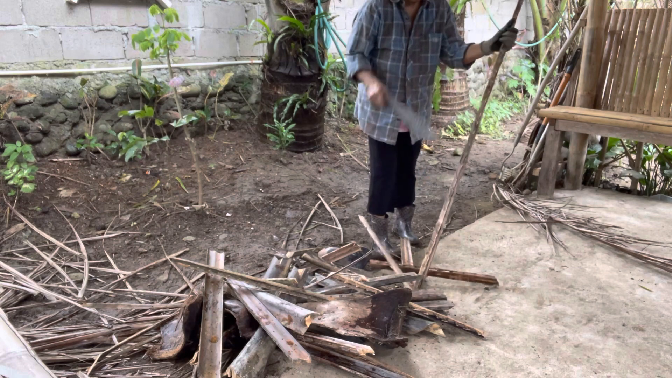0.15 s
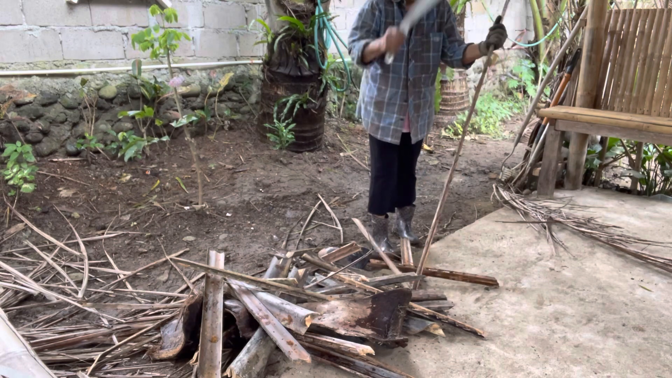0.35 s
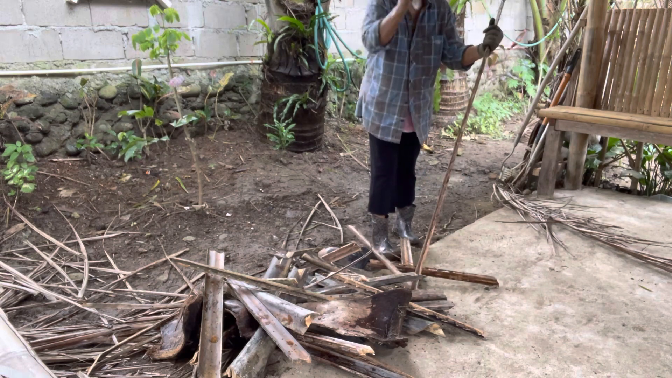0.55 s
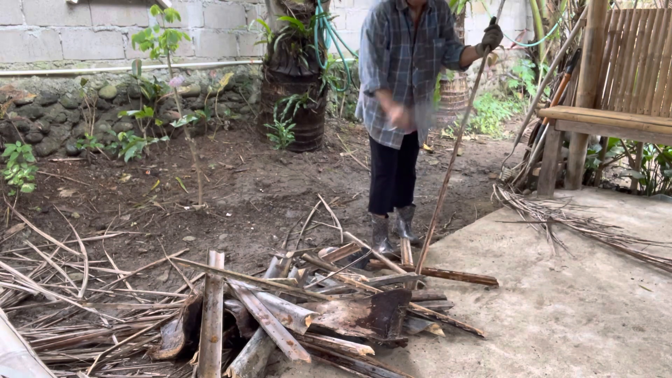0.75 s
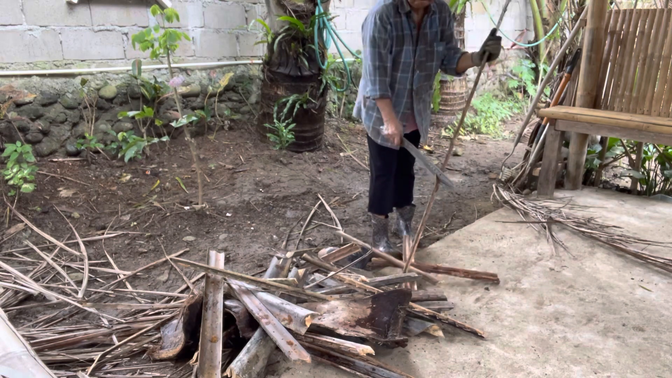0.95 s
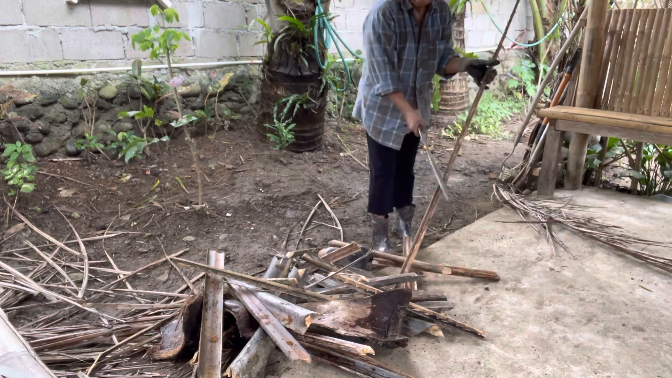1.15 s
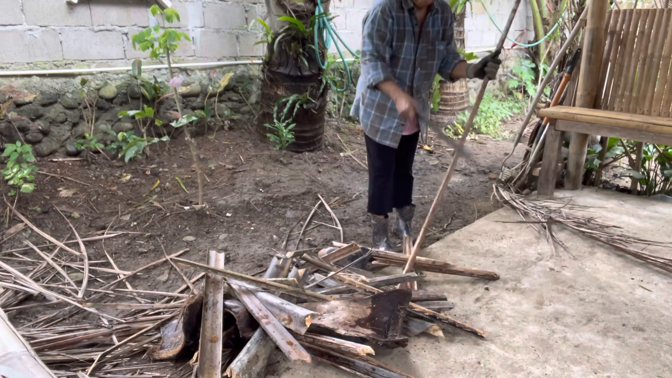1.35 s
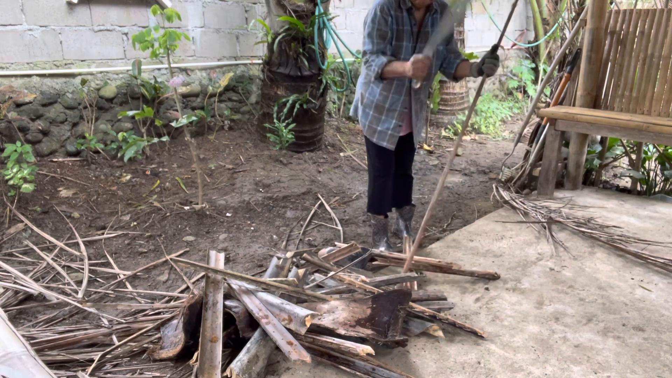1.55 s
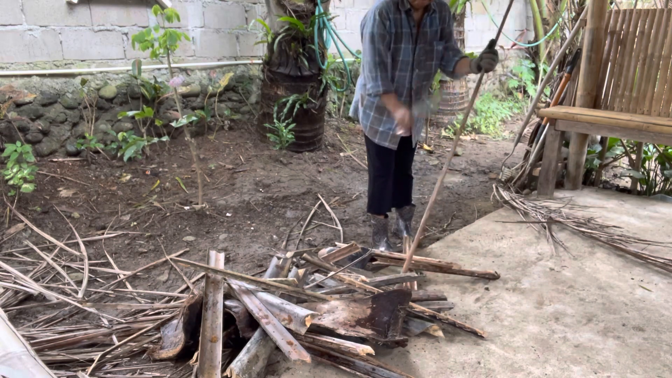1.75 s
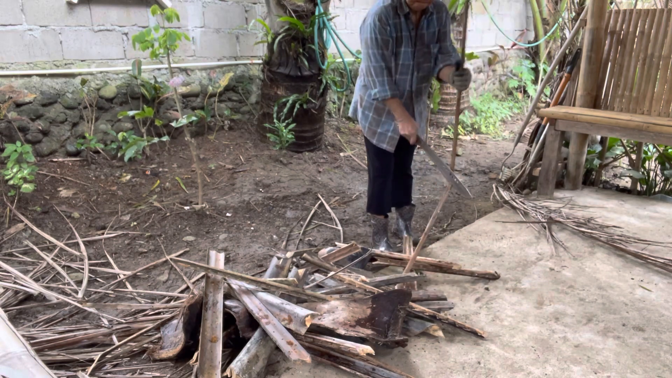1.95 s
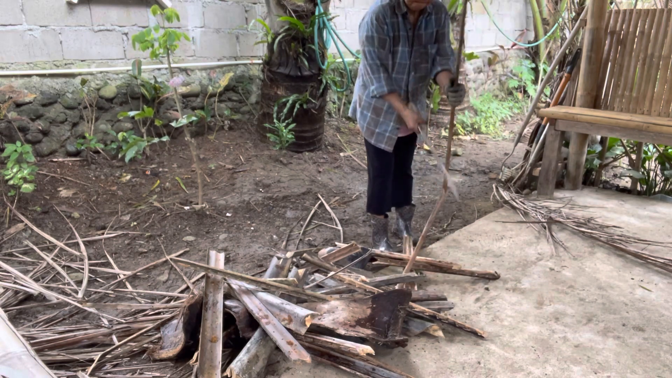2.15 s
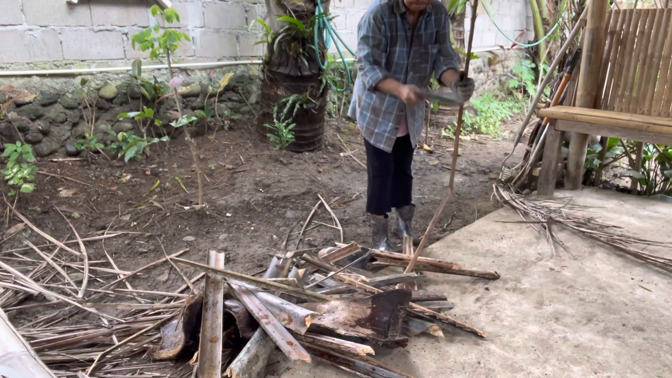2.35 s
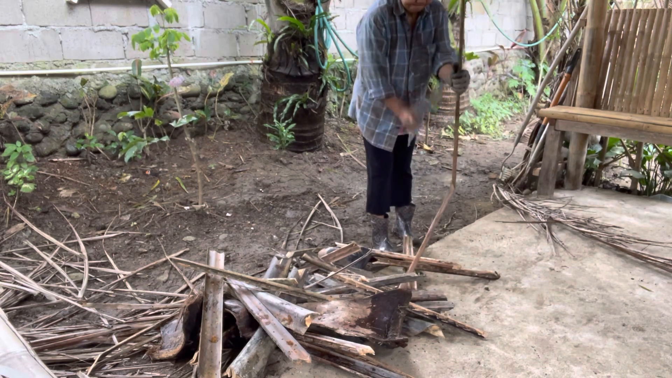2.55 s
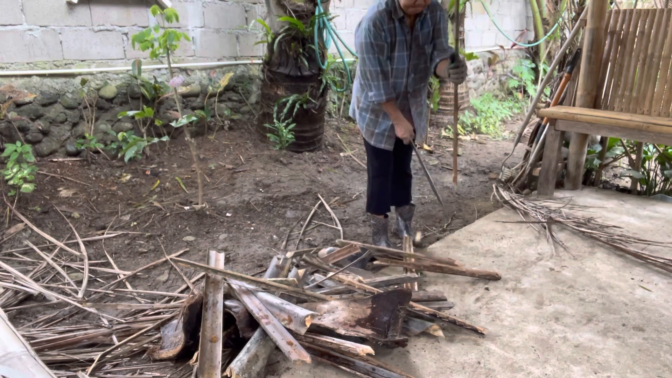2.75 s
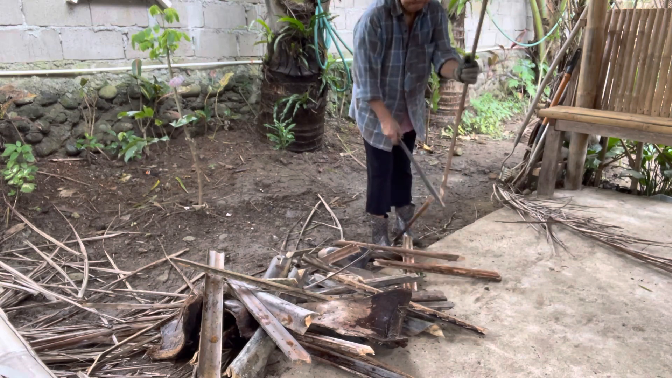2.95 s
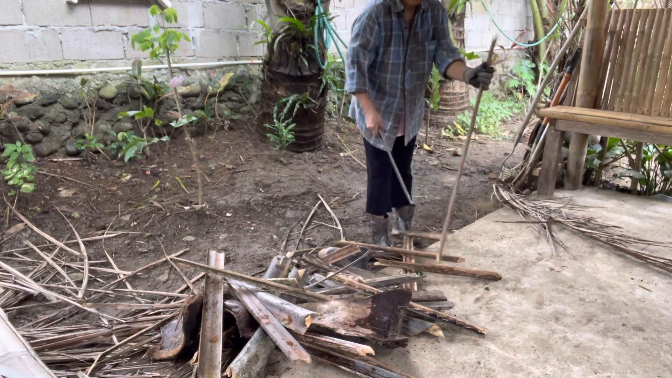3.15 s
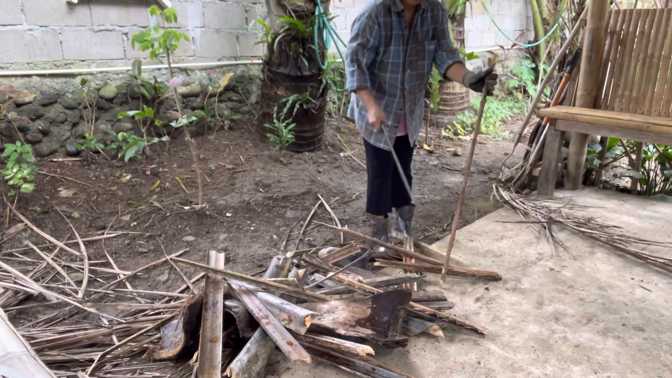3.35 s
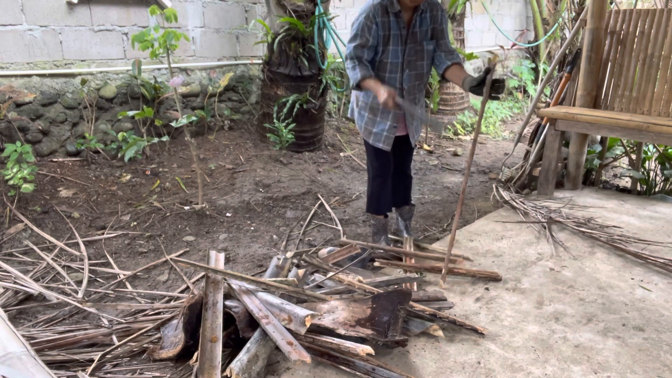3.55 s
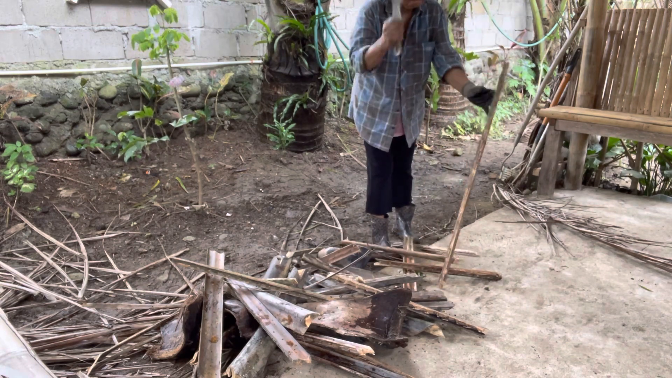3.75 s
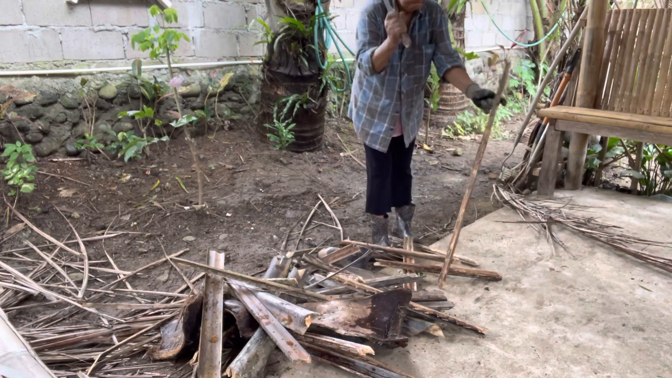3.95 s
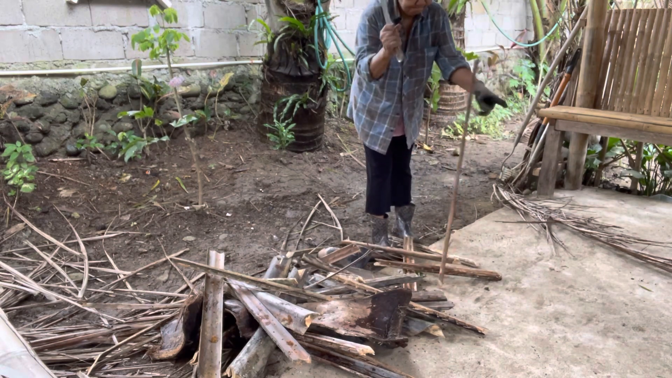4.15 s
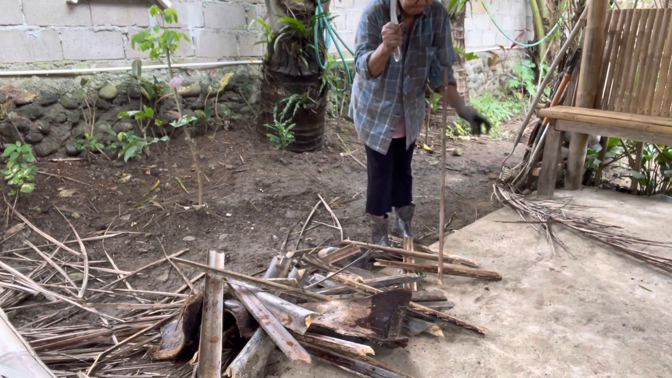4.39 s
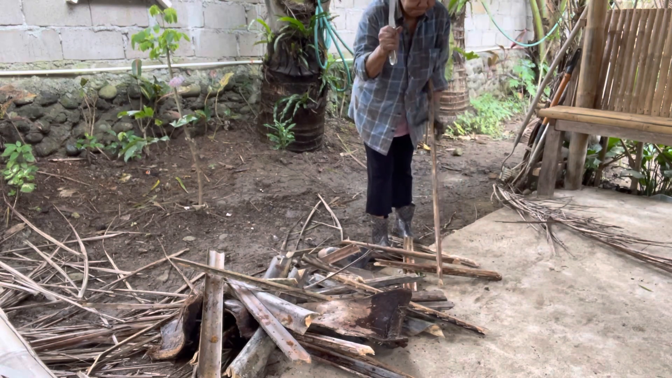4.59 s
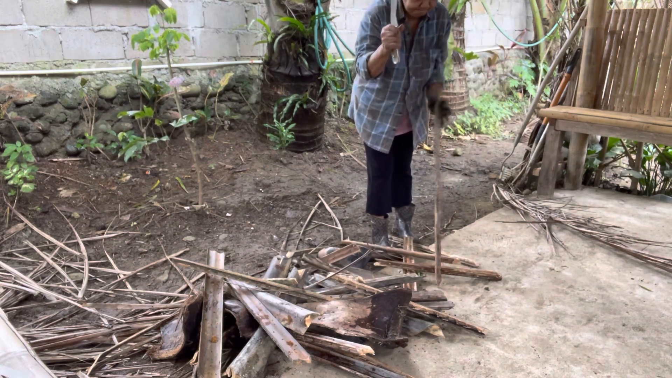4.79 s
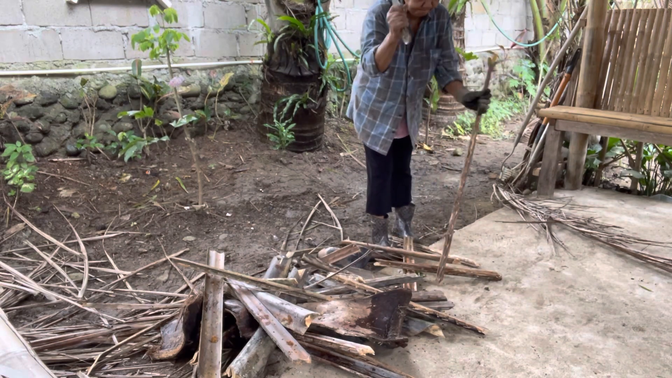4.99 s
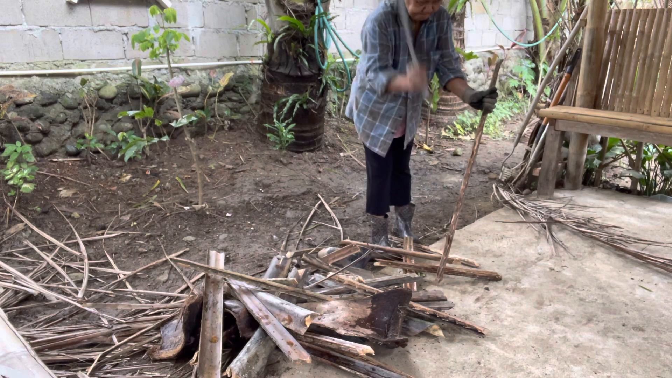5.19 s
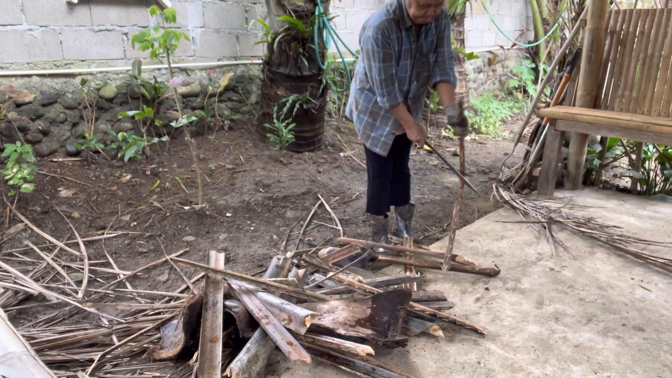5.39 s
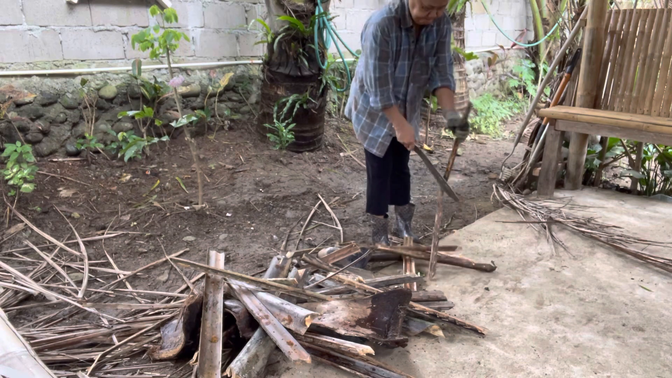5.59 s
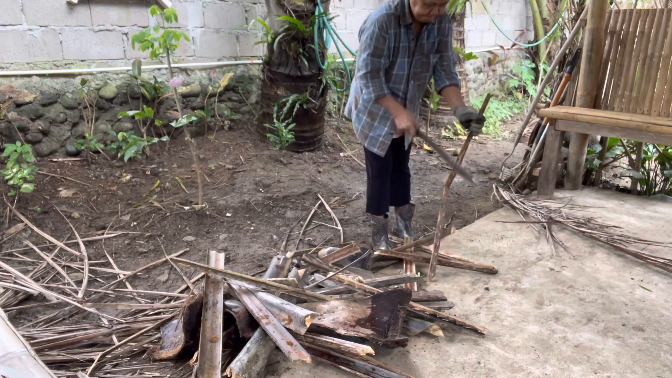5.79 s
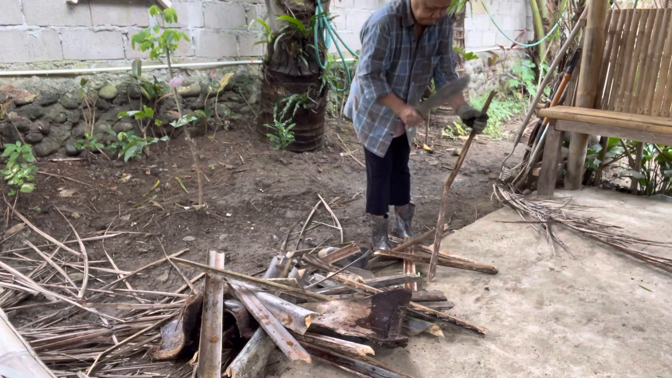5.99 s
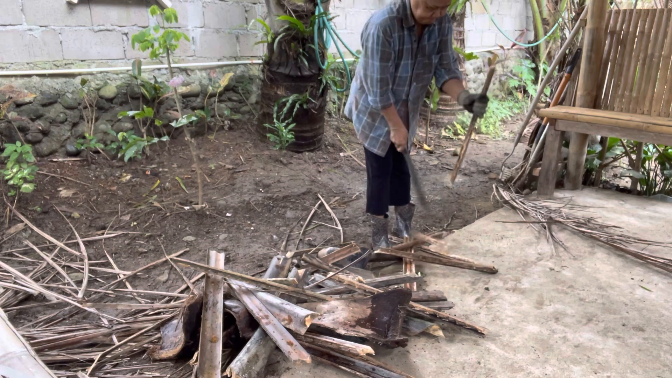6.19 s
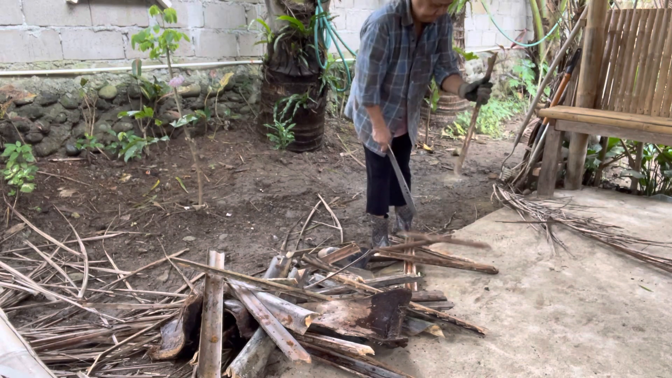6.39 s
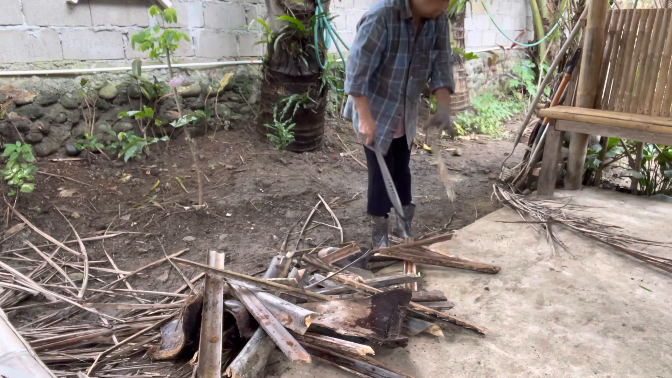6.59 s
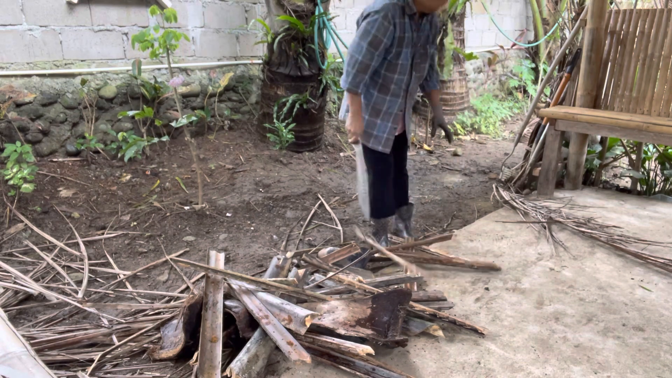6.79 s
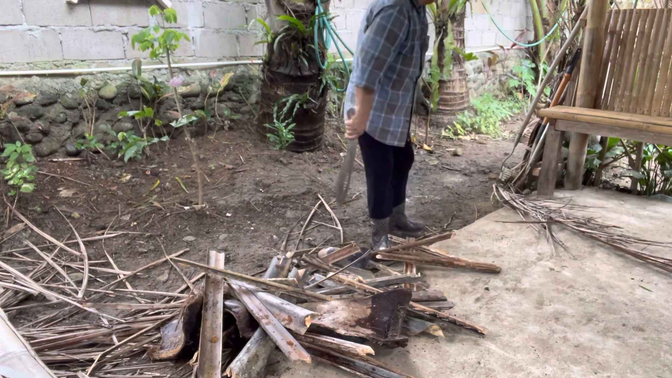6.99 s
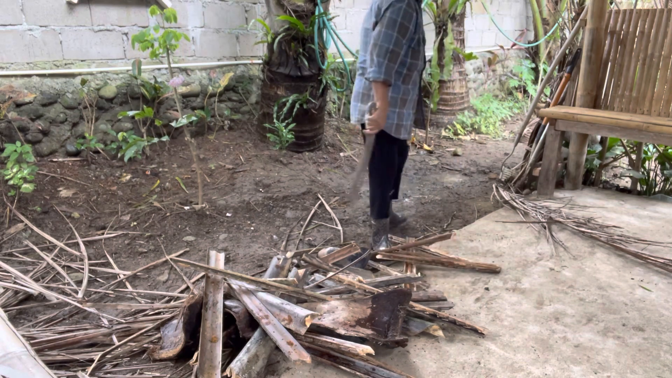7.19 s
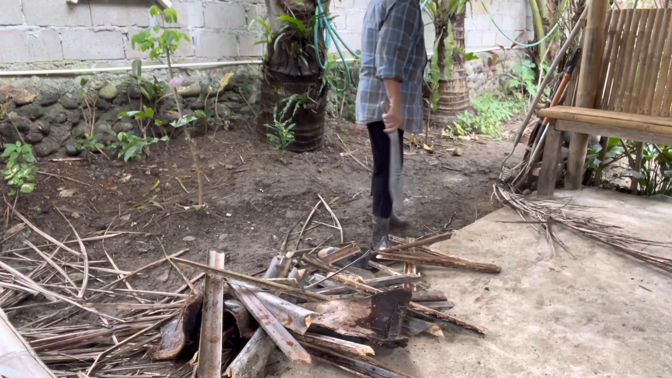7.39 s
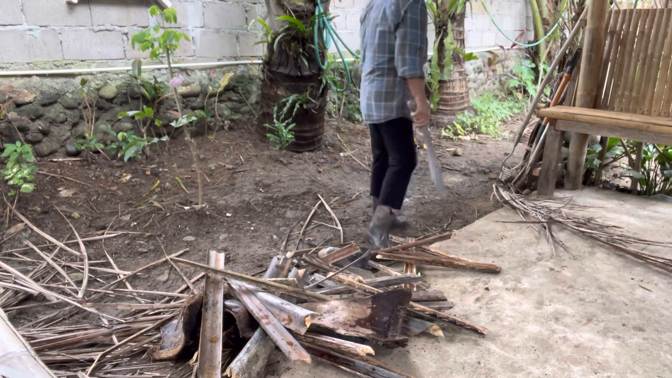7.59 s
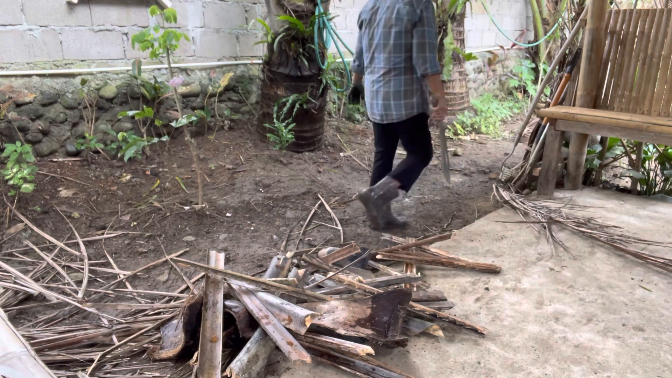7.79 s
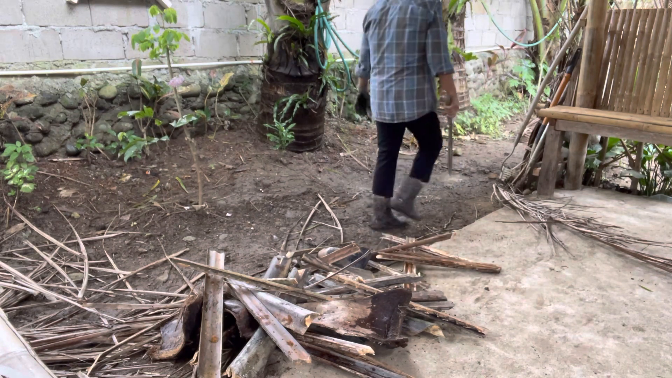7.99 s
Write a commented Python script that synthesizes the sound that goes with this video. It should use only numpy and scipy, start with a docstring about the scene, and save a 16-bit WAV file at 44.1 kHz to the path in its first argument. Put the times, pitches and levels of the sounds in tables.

```python
"""Air wash, a far engine and insect hiss lie under the whole scene, made of shaped noise and wavering sines.
A first small crack leads to a long blade chopping dry stalks in a walled yard: sprays of clicks crack,
struck-wood modes knock, grains rustle and a stick scrapes; then a dog barks among walls, a gliding voice
with echoes. The steel rings between barks, more chops follow the dog's pause, and two last barks come
near the end with the last rustle. A small stereo microphone hears it all."""
import sys
import numpy as np
from scipy import signal
from scipy.fft import rfft, irfft
from scipy.io import wavfile
from scipy.ndimage import uniform_filter1d

SR = 44100
rng = np.random.default_rng(int(sys.argv[2]) if len(sys.argv) > 2 else 0)


def unload_wav(signal):
    """Save mono or channel-first audio to the path in sys.argv[1] as 16-bit WAV at rate SR, clipped to [-1, 1]."""
    wavfile.write(
        sys.argv[1],
        SR,
        np.round(np.clip(np.atleast_2d(signal).T, -1, 1) * 32767).astype(np.int16),
    )


N = 354563

# Far traffic wash, spectrum shape: freq_hz, density_db (per Hz, relative)
AIR_SPECTRUM = [(15, -66), (25, -41), (29, -20), (40, -21.5), (65, -3), (121, -18.5), (349, -22.5),
                (553, -28), (746, -27.5), (979, -32), (1640, -36.5), (2820, -41.5), (7920, -52),
                (14400, -54.5), (16500, -89)]
# Swell of the wash, only its departure from the mean counts: time_s, level_db
AIR_SWELL = [(0.0, -51), (1.3, -46.5), (2.24, -52.5), (7.52, -55), (8.04, -56)]
# Far engine speeding up, slowing and picking up again: time_s, firing_hz, level_db
ENGINE_RUN = [(0, 62, -39.5), (.3, 62.8, -33.5), (.62, 64.6, -42), (.9, 65.86, -36), (1.15, 67, -43.5),
              (1.55, 68.9, -34), (2.25, 70, -42.5), (2.55, 69.9, -39.5), (3.25, 68, -52), (3.5, 66, -47),
              (3.72, 65.5, -50.5), (4.15, 64.5, -44), (5, 59, -55), (5.8, 57, -63), (6.4, 60.85, -46),
              (6.8, 62.5, -48), (7.55, 66.2, -44.5), (7.749, 66.2, -64), (8.04, 66.8, -49)]
# Weaker engine orders: multiple of the firing, level_db (below the firing tone)
ENGINE_ORDERS = [(1.5, -17), (2.5, -21)]
# Insect hiss band: centre_hz, half_width_hz, level_db
INSECT_BAND = (8382, 450, -70.5)
# Faint far tones, a low hum and two chirps: start_s, length_s, pitch_hz, level_db
FAR_TONES = [(3.741, 0.49, 75.6, -40), (4.34, 0.071, 1640, -52.5), (7.83, 0.15, 1720, -57.5)]

# Barks: start_s, length_s, effort_db, top_hz, settled_hz, overtones_db (above the lowest tone),
# roughness (0-1), mouth_db (mouth resonance above the other overtones)
DOG_BARKS = [(1.449, 0.072, -22.5, 623, 579.4, -3, 0.36, -35),
             (1.754, 0.14, -27.5, 614, 564, -7.5, 0.6, -12.5),
             (2.056, 0.11, -30.5, 644.3, 583.5, -2.5, 0.39, -28),
             (2.364, 0.12, -28, 594.5, 575.4, -9.5, 0.57, -22),
             (2.941, 0.087, -28, 576, 560.2, -1, 0.24, -26), (3.45, 0.12, -31.5, 781, 635, 0, 0.77, -7.5),
             (3.939, 0.081, -27.5, 618.6, 569, -1, 0.13, -5),
             (4.602, 0.12, -28.5, 648.6, 588.5, -4, 0.76, -17),
             (6.97, 0.08, -26.5, 590, 559.5, -0.5, 0.21, -15),
             (7.261, 0.12, -31, 629.4, 580.7, 3, 0.36, -15)]
# Throat colour of the overtones: freq_hz, level_db
THROAT_COLOUR = [(500, -13), (1200, 2.5), (1800, -7.5), (2300, -13.5), (3000, -22), (3600, -36.5)]
# Breath colour: freq_hz, level_db
BREATH_COLOUR = [(300, -11), (600, -8.5), (1000, 10.5), (1700, 5), (2500, -0.5), (3200, -13), (3700, -29)]
# Mouth resonance as the jaw shuts: share of the bark (0-1), resonance_hz
JAW_GLIDE = [(0, 1550), (.45, 1450), (.7, 1120), (1, 720)]
# Near walls returning the bark: delay_s, level_db
WALL_ECHOES = [(0.03, -6.5), (.021, -4), (0.044, -3.5), (0.078, -11.5)]
# Colour of the late echo: freq_hz, level_db
LATE_ECHO_COLOUR = [(500, -3), (1200, -0.5), (1900, -2), (3000, 2.5)]
# Every bark starts low, climbs, holds its top for TENSE_S and sinks, all at one pace
START_HZ, TENSE_S, CLIMB_HZ_PER_S, SINK_HZ_PER_S = 517.4, .011, 9200, 4000
REBOUND_HZ = 44.3  # upward creep over one bark length as the throat tightens
JAW_WIDTH_HZ = 35  # half width of the mouth resonance
HALF_DB = -7  # half tones at the bark's end: slack folds skip every other beat
NEAR_DB, SIDE_DB = -10, -7  # scatter from near walls, and the part that differs between the ears
# The dog stands right: left ear hears it this many samples late, right as many early;
# left is this share softer, right as much louder
DOG_LAG, DOG_RIGHT = 5, .11

# Dry leaves and litter sliding, and first at 0.79 s a crack that swells in softly: start_s, swell_s, level_db,
# top_treble_db (above level), t60_s
RUSTLE_SLIDES = [(0.79, 0.0047, -36, 4, 0.65), (1.034, 0.049, -34.5, -13.5, 0.94),
                 (1.84, .01, -50, -4, 1.26), (2.66, 0.0072, -36, -20, 0.32), (3.1, 0.11, -55, 1, 0.39),
                 (5.307, 0.0088, -41, 1, 0.072), (5.35, 0.0092, -51, 6.5, 0.19),
                 (6.179, 0.0065, -35.5, -4, 0.27), (7.28, 0.1, -53.5, -7, 0.49)]
# Body of the rustle: freq_hz, level_db
LITTER_COLOUR = [(80, 0), (250, 8.5), (800, 2.5), (2500, -2), (5000, -5.5), (8000, -22), (10000, -38)]
TREBLE_LASTS = 0.57  # share of a rustle's t60 that its top treble lasts
# A stick sliding: start_s, hold_s, level_db, t60_s
STICK_SCRAPE = (.921, .03, -40, .25)
# Stick resonance: freq_hz, level_db
STICK_COLOUR = [(1400, -16), (1900, -5), (2350, 0), (2750, -6), (3200, -3), (3500, -22)]

# The blade set ringing: start_s, level_db, damped_after_s (by hand or wood), upper_modes_db
BLADE_STRIKES = [(2.645, -47, .3, 0), (2.945, -62, .15, 8), (5.55, -72, .2, 10), (6.145, -42.5, .4, -14),
                 (6.713, -41, .3, -3)]
# Steel modes, the first two being the lower pair: freq_hz, level_db, t60_s
STEEL_MODES = [(4065, 0, .64), (4095, -5, .4), (5395, -10, 1.1), (6545, -6, .2), (7590, -3, .15),
               (8570, -8, .25), (11085, 1, .25)]
# Wood knocking on wood and ground: start_s, knock_db, thud_db, knock_hz, thud_hz
WOOD_KNOCKS = [(0.797, -25, -21, 803, 296.5), (0.8, -10.5, -14.5, 758, 237), (1.043, -34, -34, 906, 365),
               (1.809, -25.5, -33, 847, 341), (1.813, -31, -12, 1274, 250), (2.644, -27.5, -34, 844, 336),
               (2.72, -31, -29, 804, 310), (3.232, -34, -24, 763, 247), (3.33, -43.5, -41, 1084, 262),
               (5.317, -22.5, -22, 864, 264), (5.326, -60, -17, 714, 154), (5.333, -58.5, -27, 600, 91),
               (6.141, -32.5, -34, 787, 226), (6.183, -34.5, -36, 843, 339), (6.48, -33.5, -39.5, 860, 383),
               (6.54, -40, -46, 667, 245), (6.713, -34.5, -44.5, 1096, 334), (6.787, -42, -28, 1280, 234),
               (6.829, -31, -29, 750, 255)]
# Stalk modes: multiple of the knock, level_db, t60_s
STALK_MODES = [(1, 12, 0.014), (1.36, 0.5, 0.026), (1.92, 15, 0.0038), (3.2, -16.5, 0.1)]
# Ground modes: multiple of the thud, level_db, t60_s
GROUND_MODES = [(.7, -8, 0.12), (1, 0, 0.083), (1.55, -9, 0.11)]
THUD_DROP, THUD_DROP_S, THUD_RISE_S = 1.5, .003, .004  # a thud starts this share higher, settles, swells
# Fibres splitting and twigs snapping: start_s, strength_db, top_treble_db (above strength), t60_s
STALK_CRACKS = [(0.504, -44, -9, 0.065), (0.803, -1, -15, 0.16), (1.8085, -6, -17.5, 0.27),
                (1.8984, -36, 3, 0.059), (1.94, -43, 1.5, 0.64), (1.9894, -11.5, -14.5, 0.097),
                (2.161, -43, -3.5, 0.062), (2.2809, -33, -15.5, 0.123), (2.4678, -42, -8, 0.091),
                (2.635, -12, -21.5, 0.51), (2.6443, -9.5, -9, 0.12), (2.7379, -17, -23, 0.08),
                (2.8854, -50.5, 1, 0.066), (2.9417, -41.5, -0.5, 0.304), (3.232, -26.5, -24, 0.25),
                (3.3295, -32, -33, 1), (3.84, -49.5, 3, 0.19), (5.3183, -16, -3.5, 0.12),
                (5.3236, -1, -19.5, 0.23), (5.482, -35, -13, 0.475), (5.5515, -41.5, -2.5, 0.076),
                (6.1375, -17, -10, 0.075), (6.1441, -3, -18, 0.14), (6.48, -25.5, -21.5, 0.17),
                (6.5374, -32, -26, 0.22), (6.7127, -18, -23, 0.19), (6.7853, -30, -4, 0.024),
                (6.8292, -21, -33, 0.27), (6.9481, -34.5, -24.5, 0.25), (7.2894, -24.5, -29, 0.16)]
# Lower treble of a crack: freq_hz, level_db
SPLIT_COLOUR = [(150, -17), (700, -24), (2500, -28.5), (6000, -21), (8000, -43), (10000, -45)]
# Top treble of a crack, and of a rustle: freq_hz, level_db
SNAP_COLOUR = [(5000, -9), (8000, -2.5), (11000, 3.5), (14500, -2.5), (16000, -26)]
# Short wood modes of a splinter: freq_hz, level_db, t60_s
SPLINTER_MODES = [(950, -3, .012), (2450, 0, .016), (2850, -1, .016), (4400, -4, .012)]
SPLINTERS_PER_S, SPLINTER_DB = 770, -27.5  # mean rate, level against the crack

# Stereo spread: freq_hz, side_db (gain of the side signal)
SIDE_WIDTH = [(60, -11), (130, -12), (300, -5.5), (700, 3), (1500, 0.5), (4000, -0.5), (7500, 7.5),
              (10000, -3), (15000, -24.5)]
EDGE_HZ = 16500  # top of the microphone's band


def amp(db):
    """Gain of a level in dB."""
    return 10 ** (np.asarray(db) / 20)


def evened(x):
    """Scaled to rms 1."""
    return x / np.sqrt(np.mean(x ** 2) + 1e-20)


def read(points, hz):
    """Level of a spectrum table at the given frequencies, joined along log frequency."""
    table_hz, level_db = np.transpose(points)
    return np.interp(np.log(hz + 1), np.log(table_hz + 1), level_db)


def colour(x, points):
    """Filters x by a spectrum table."""
    size = x.shape[-1]
    gain = amp(read(points, np.fft.rfftfreq(size, 1 / SR)))
    return irfft(rfft(x) * gain, size)


def add(mix, start_s, sound):
    """Mixes a sound in at start_s, cut at the end of the mix."""
    part = mix[round(start_s * SR):][:len(sound)]
    part += sound[:len(part)]


def drift(size, span_s):
    """Slow chance of rms 1: noise smoothed twice over span_s."""
    steps = max(int(span_s * SR), 1)
    once = uniform_filter1d(rng.standard_normal(size), steps)
    return evened(uniform_filter1d(once, steps))


def ring(modes, factor, length_s, drop=0):
    """Dying sines of a struck body; with drop the pitch starts high and settles."""
    t = np.arange(round(length_s * SR)) / SR
    bent = t + drop * THUD_DROP_S * (1 - np.exp(-t / THUD_DROP_S))
    return sum(amp(db - 60 * t / t60) * np.sin(2 * np.pi * hz * factor * bent) for hz, db, t60 in modes)


def walls(x, gap_s, low_t60, high_t60):
    """Echo tail: sparse taps of random sign after a gap, bass and treble dying at their own speeds."""
    taps = rng.choice([-1., 1.], SR) * (rng.random(SR) < 2500 / SR)  # 2500 echoes a second
    low = signal.lfilter(*signal.butter(2, 2000, fs=SR), taps)
    high = taps - low
    t = np.arange(SR) / SR
    tail = low * amp(-60 * t / low_t60) + high * amp(-60 * t / high_t60)
    tail = tail * (t > gap_s)
    return signal.fftconvolve(x, tail / np.linalg.norm(tail))[:N]


def air():
    """Far traffic wash, noise with drifting patches; bass follows the swell, treble less so."""
    frames, hz = N // 256 + 5, np.fft.rfftfreq(1024, 1 / SR)
    real, imaginary, patches = rng.standard_normal((frames, 513, 3)).T
    patches = uniform_filter1d(patches, 12, 0)  # over frequency
    patches = evened(uniform_filter1d(patches, 14, 1))  # over time
    swell_s, level_db = np.transpose(AIR_SWELL)
    swell_db = np.interp(np.arange(frames) * 256 / SR, swell_s, level_db - level_db.mean())
    follow = 1 / (1 + hz / 2500)
    level = read(AIR_SPECTRUM, hz)[:, None] + 0.45 * patches + follow[:, None] * swell_db
    bins = (real + 1j * imaginary) * amp(level)
    wash = signal.istft(bins, nperseg=1024, noverlap=768)[1][:N]
    return amp(-46.5) * evened(wash)


def engine():
    """The firing tone and two weaker orders, all wavering with the long path."""
    time_s, firing_hz, level_db = np.transpose(ENGINE_RUN)
    t = np.arange(N) / SR
    hz = np.interp(t, time_s, firing_hz) * (1 + 0.011 * drift(N, 0.046))
    turns = np.cumsum(hz) / SR
    orders = sum(amp(db + 1.63 * drift(N, 0.048)) * np.sin(2 * np.pi * multiple * turns)
                 for multiple, db in ENGINE_ORDERS)
    level = amp(np.interp(t, time_s, level_db) + 2.2 * drift(N, 0.11))
    return np.sqrt(2) * level * (np.sin(2 * np.pi * turns) + orders)


def insects():
    """Insect hiss: a narrow noise band with a slight flutter in level."""
    centre_hz, half_width_hz, level_db = INSECT_BAND
    edges = [centre_hz - half_width_hz, centre_hz + half_width_hz]
    band = signal.butter(2, edges, "bandpass", fs=SR, output="sos")
    hiss = evened(signal.sosfilt(band, rng.standard_normal(N)))
    return amp(level_db + 1.45 * drift(N, 0.017)) * hiss


def far_tones():
    """Short unsteady sines from far away, each swelling and fading."""
    out = np.zeros(N)
    for start_s, length_s, pitch_hz, level_db in FAR_TONES:
        size = round(length_s * SR)
        turns = np.cumsum(pitch_hz * (1 + 0.0195 * drift(size, .004))) / SR
        add(out, start_s, amp(level_db) * np.sin(2 * np.pi * turns) * np.hanning(size))
    return out


def bark(length_s, effort_db, top_hz, settled_hz, overtones_db, roughness, mouth_db):
    """Pitch scoops up and sinks; overtones grow as the mouth opens, breath and half tones as folds slacken."""
    t = np.arange(0, length_s, 1 / SR)
    size, share = len(t), t / length_s
    breath = np.clip(roughness * (.27 + 1.5 * share ** 2), 0, .95)

    scoop_s = TENSE_S + (top_hz - START_HZ) / CLIMB_HZ_PER_S
    sunk_s = scoop_s + TENSE_S + abs(top_hz - settled_hz) / SINK_HZ_PER_S
    glide_s = [0, scoop_s, scoop_s + TENSE_S, sunk_s, sunk_s + length_s]
    glide_hz = [START_HZ, top_hz, top_hz, settled_hz, settled_hz + REBOUND_HZ]
    hz = uniform_filter1d(np.interp(t, glide_s, glide_hz), size=300)
    hz = hz * (1 + .05 * breath * drift(size, .004) + .012 * drift(size, .012))
    turns = np.cumsum(hz) / SR

    # uneven folds: each overtone comes, goes and wavers by itself; odd k are the half tones
    tones = np.zeros(size)
    for k in range(3, 13):
        half_db = (k % 2) * (HALF_DB - 32 * (1 - share))
        level = amp(read(THROAT_COLOUR, k / 2 * hz) + 3.5 * drift(size, .012) + half_db)
        waver = (.1 + roughness) * k / 14 * drift(size, .012)
        tones += level * np.cos(np.pi * k * turns + waver)

    # breath noise pulses once a beat; shifting it down, low-passing and back up makes a gliding resonance
    puffs = (2.0 + np.exp(-(turns % 1) / 0.13)) * rng.standard_normal(size)
    jaw_share, jaw_hz = np.transpose(JAW_GLIDE)
    spin = np.exp(2j * np.pi * np.cumsum(np.interp(share, jaw_share, jaw_hz)) / SR)
    jaw = (spin * signal.lfilter(*signal.butter(2, JAW_WIDTH_HZ, fs=SR), puffs / spin)).real

    rasp = .48 * np.sqrt(breath) * evened(colour(puffs, BREATH_COLOUR))
    upper = np.sqrt(1 - breath) * evened(tones) + rasp
    mouth_open = 1 - np.exp(-(t / 0.037) ** 2)
    lowest = np.sqrt(2) * (1 - breath) * amp(2.8 * drift(size, 0.0044)) * np.cos(2 * np.pi * turns)
    voice = lowest + amp(overtones_db) * mouth_open * (upper + amp(mouth_db) * evened(jaw))
    rise = 1 - np.exp(-t / .016)
    return amp(effort_db) * voice * rise * np.sqrt(np.cos(np.pi / 2 * share))


def dog():
    """A far dog with strong wall echoes; moving air smears and breaks up the late ones."""
    direct = np.zeros(N)
    for start_s, *settings in DOG_BARKS:
        add(direct, start_s, bark(*settings))
    out = direct.copy()
    for delay_s, level_db in WALL_ECHOES:
        add(out, delay_s, amp(level_db) * direct)
    smeared = np.interp(np.arange(N) + 5 * drift(N, .015), np.arange(N), direct)
    late = colour(walls(smeared, .04, 0.82, 0.85), LATE_ECHO_COLOUR)
    late = late * amp(1.2 * drift(N, .03))
    return out + amp(NEAR_DB) * walls(direct, 0.0071, 0.098, 0.074) + amp(-6.5) * late


def rustle():
    """Dense tiny clicks in clumps; each slide swells, then dies away, the top treble first."""
    low, high, t = np.zeros(N), np.zeros(N), np.arange(SR) / SR
    clumps_db = 2.2 * rng.exponential(1, N) + 2.2 * drift(N, .004)
    grains = rng.standard_normal(N) * amp(clumps_db)
    for start_s, swell_s, level_db, top_db, t60 in RUSTLE_SLIDES:
        rise = np.minimum(t / max(swell_s, .002), 1)
        after = np.maximum(t - swell_s, 0)
        add(low, start_s, rise * amp(level_db - 60 * after / t60))
        add(high, start_s, rise ** 2 * amp(level_db + top_db - 60 * after / (TREBLE_LASTS * t60)))
    return low * evened(colour(grains, LITTER_COLOUR)) + high * evened(colour(grains, SNAP_COLOUR))


def scrape():
    """Grainy friction rings the stick, holds, then dies."""
    start_s, hold_s, level_db, t60 = STICK_SCRAPE
    out, t = np.zeros(N), np.arange(SR // 3) / SR
    slips = rng.standard_normal(len(t)) * amp(3 * rng.exponential(1, len(t)))
    stick = evened(colour(slips, [(900, -50), *STICK_COLOUR, (4200, -50)]))
    add(out, start_s, amp(level_db - 60 * np.maximum(t - hold_s, 0) / t60) * stick)
    return out


def blade():
    """Steel modes, faded out as the blade is damped; each strike sets its own share of upper modes."""
    out = np.zeros(N)
    for start_s, level_db, length_s, upper_db in BLADE_STRIKES:
        tone = ring(STEEL_MODES[:2], 1, length_s) + amp(upper_db) * ring(STEEL_MODES[2:], 1, length_s)
        damping = np.minimum(np.arange(len(tone))[::-1] / 6000, 1)  # fade over the last 6000 samples
        add(out, start_s, amp(level_db) * tone * damping)
    return out


def knocks():
    """Three quick contacts ring the stalk; the ground answers with one thud and no deep bass."""
    out, samples = np.zeros(N), np.arange(round(.12 * SR))
    soft = np.minimum(samples / (0.001 * SR), 1)
    swell = np.minimum(samples / (THUD_RISE_S * SR), 1)
    for start_s, knock_db, thud_db, knock_hz, thud_hz in WOOD_KNOCKS:
        add(out, start_s, amp(thud_db) * ring(GROUND_MODES, thud_hz, .12, THUD_DROP) * swell)
        later_s = rng.uniform(0.00229, 0.011, 2)
        for delay_s, db in zip([0, *later_s], [0, -8, -11]):
            add(out, start_s + delay_s, amp(knock_db + db) * ring(STALK_MODES, knock_hz, .12) * soft)
    return signal.sosfilt(signal.butter(2, 65, "highpass", fs=SR, output="sos"), out)


def cracks():
    """Each is a tick, a dying spray of tiny clicks and larger splinters ringing short wood modes."""
    low, high, wood = np.zeros(N), np.zeros(N), np.zeros(N)
    t = np.arange(SR // 3) / SR
    for start_s, strength_db, top_db, t60 in STALK_CRACKS:
        spray = rng.standard_normal(len(t)) * amp(2.2 * rng.exponential(1, len(t)))
        fade = amp(-60 * t / max(t60, .01))
        tick = 2.2 * amp(-60 * t / 0.002)
        burst = evened(spray) * (fade + tick)
        add(low, start_s, amp(strength_db) * burst)
        add(high, start_s, amp(strength_db + top_db) * burst)
        splinters = rng.standard_normal(len(t)) * (rng.random(len(t)) < SPLINTERS_PER_S / SR)
        piece = ring(SPLINTER_MODES, rng.uniform(.9, 1.1), .03)
        pieces = signal.oaconvolve(splinters * fade ** 2, piece)
        add(wood, start_s, amp(strength_db + SPLINTER_DB) * pieces)
    return colour(low, SPLIT_COLOUR) + colour(high, SNAP_COLOUR) + wood


def scene():
    """Mid is the sum; side holds scattered arrivals, separate air and insects, and the dog's place."""
    barks = dog()
    near = cracks() + knocks() + rustle() + scrape()
    yard = amp(-8.5) * walls(near, 0.0027, 0.18, 0.21)
    sources = near + yard + blade() + far_tones()
    mid = sources + barks + engine() + air() + insects()

    scatter = walls(sources, .0001, 0.012, 0.022) + amp(SIDE_DB) * walls(barks, .0001, 0.24, 0.136)
    side = colour(scatter + air() + insects(), SIDE_WIDTH)
    side += (np.roll(barks, DOG_LAG) - np.roll(barks, -DOG_LAG)) / 2 - DOG_RIGHT * barks
    return np.array([mid + side, mid - side]) * amp([[-.5], [.5]])  # the right is 1 dB up on the left


def record(dry):
    """The microphone drops the deepest bass and rounds the highest peaks; then the band limit."""
    thin = signal.sosfilt(signal.butter(2, 45, "highpass", fs=SR, output="sos"), dry)
    rounded = thin / (1 + (abs(thin) / .88) ** 4) ** .25
    band_limit = signal.firwin(511, EDGE_HZ, window=("kaiser", 9), fs=SR)
    return signal.oaconvolve(rounded, band_limit[None], "same")


dry = scene()
out = record(dry)
unload_wav(out)
```